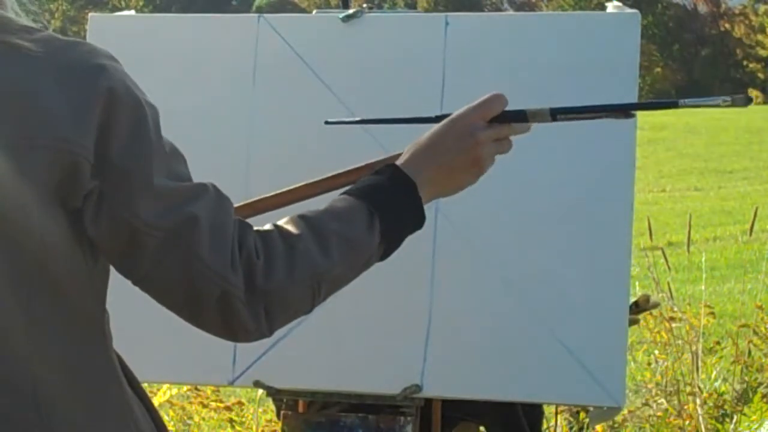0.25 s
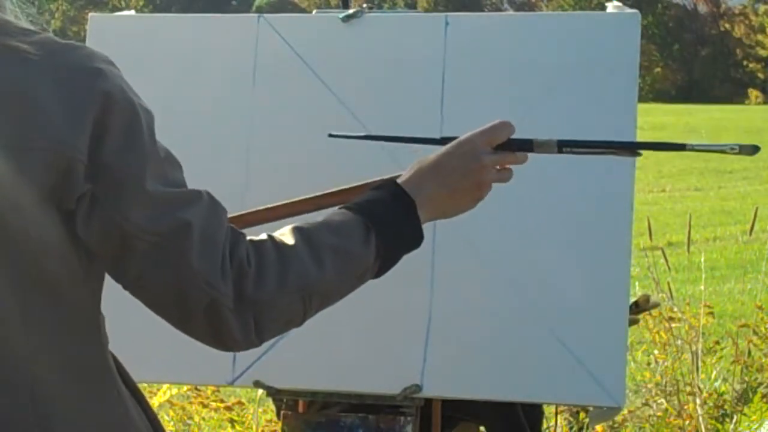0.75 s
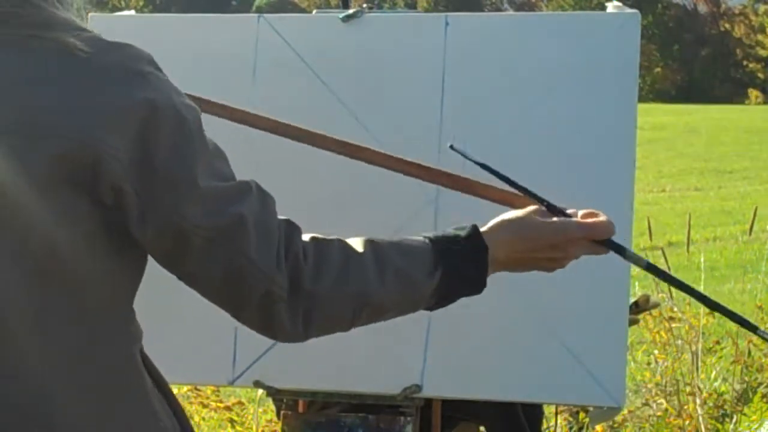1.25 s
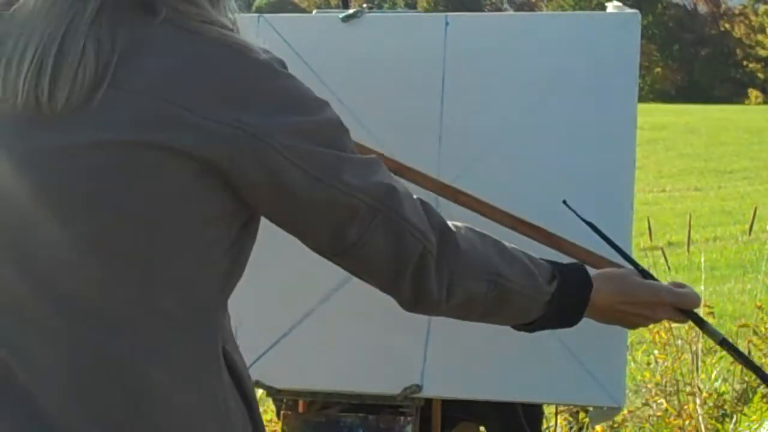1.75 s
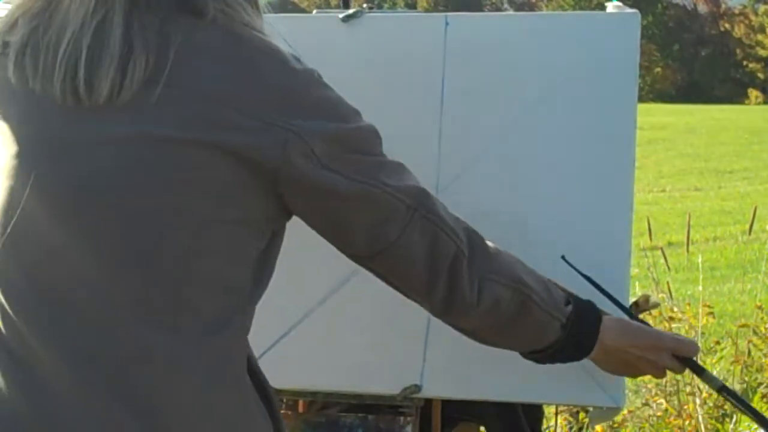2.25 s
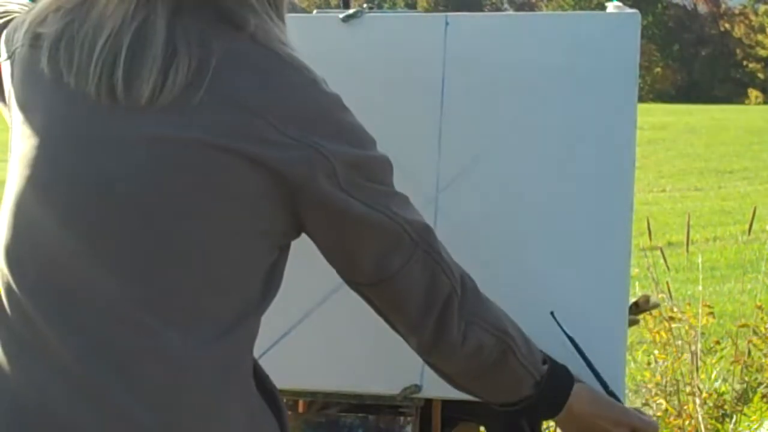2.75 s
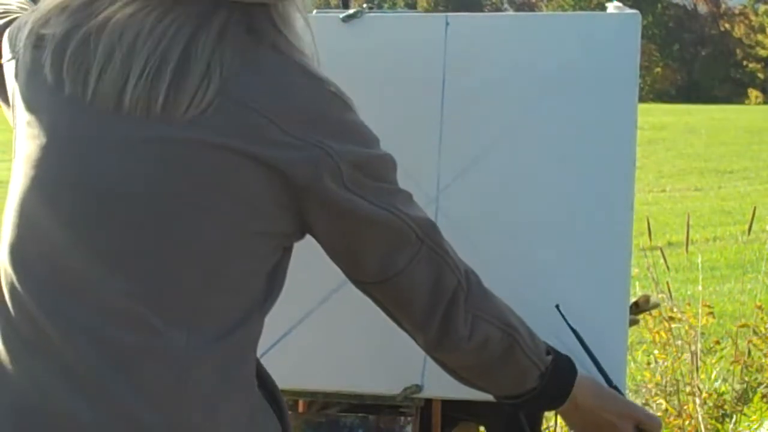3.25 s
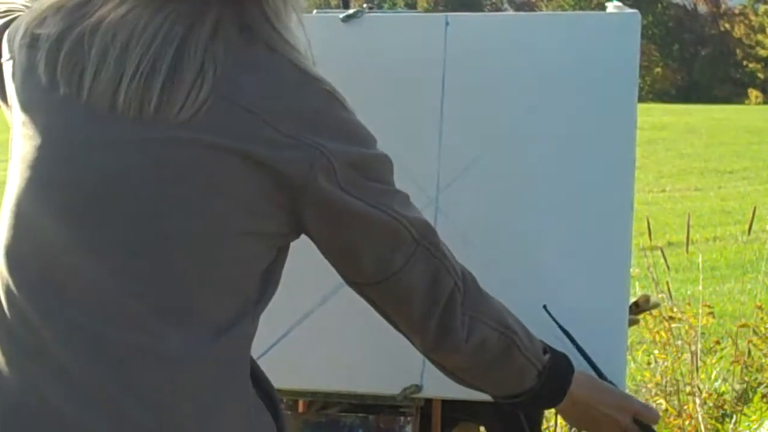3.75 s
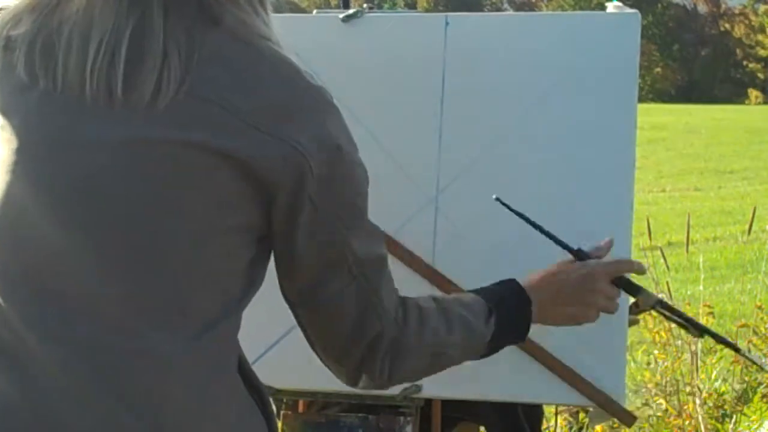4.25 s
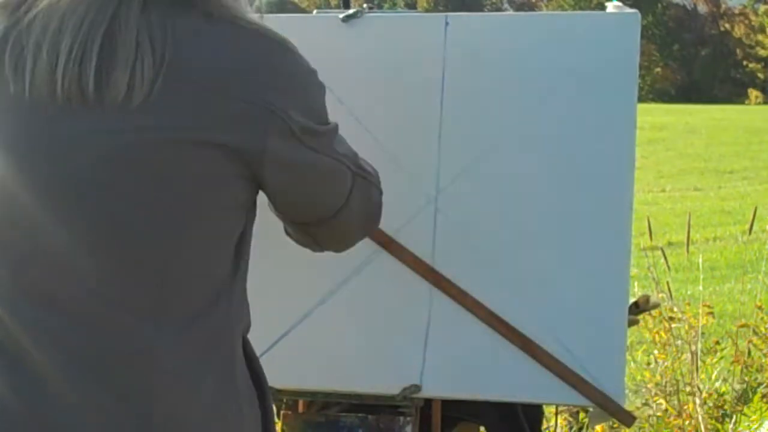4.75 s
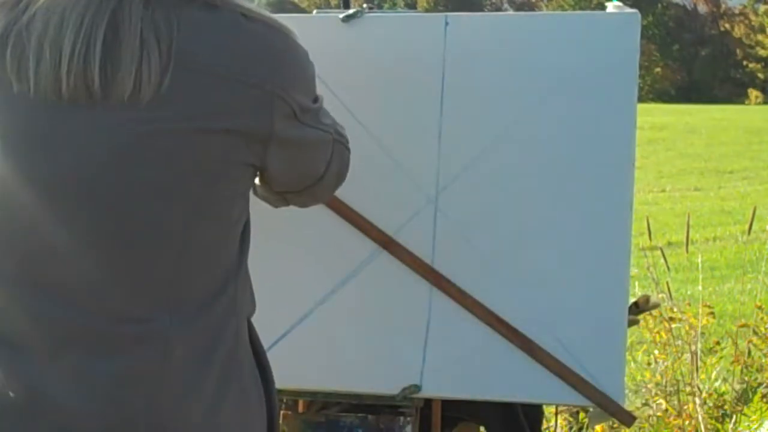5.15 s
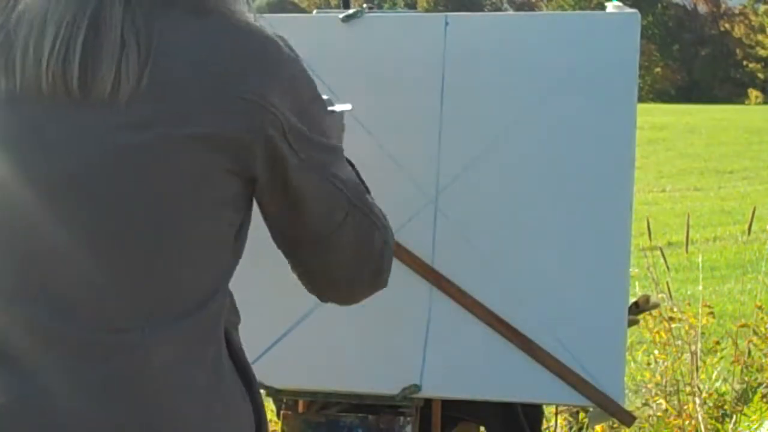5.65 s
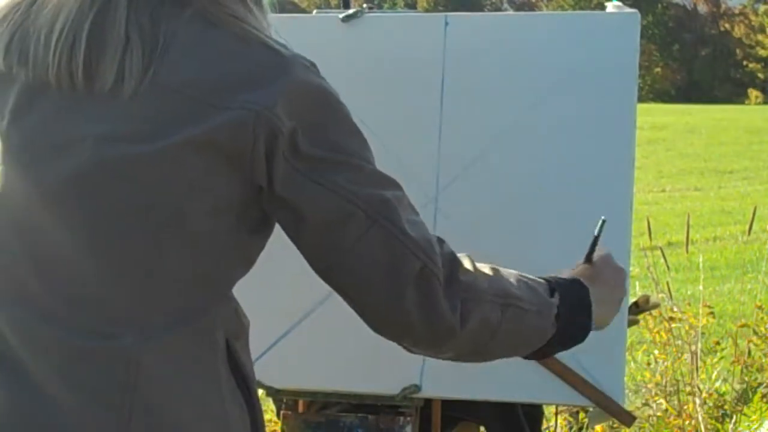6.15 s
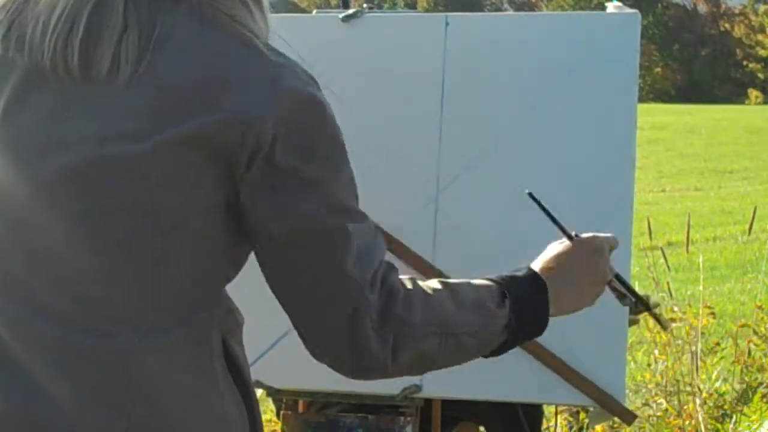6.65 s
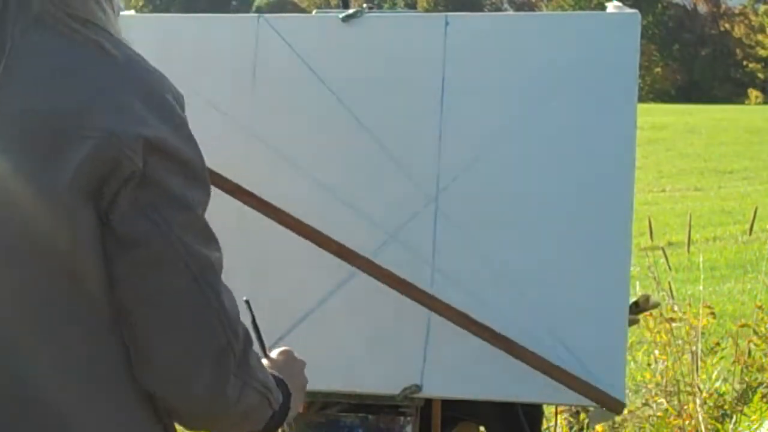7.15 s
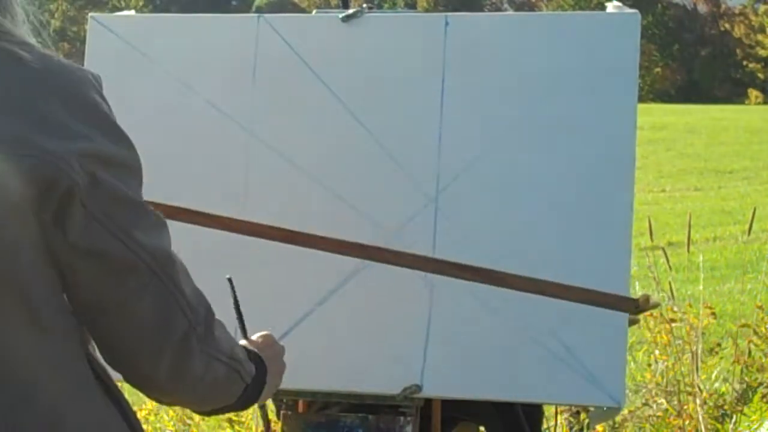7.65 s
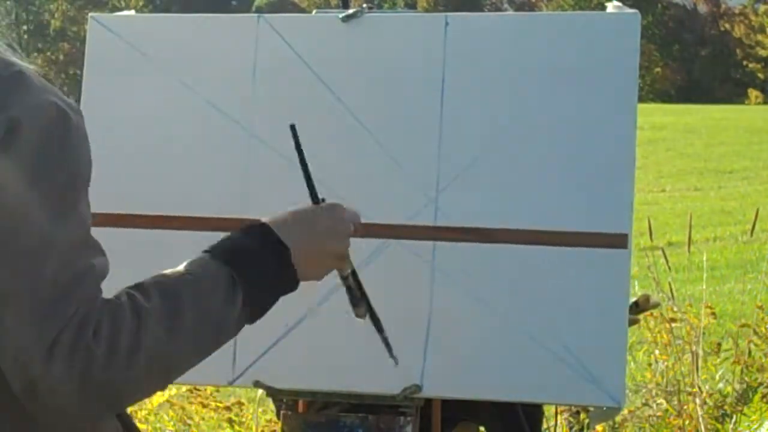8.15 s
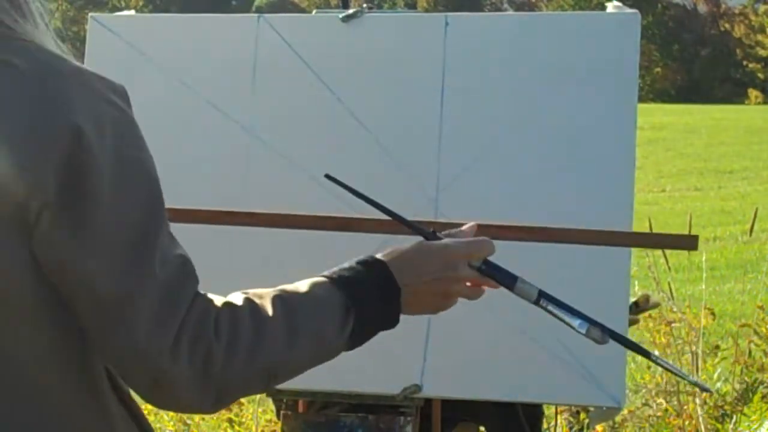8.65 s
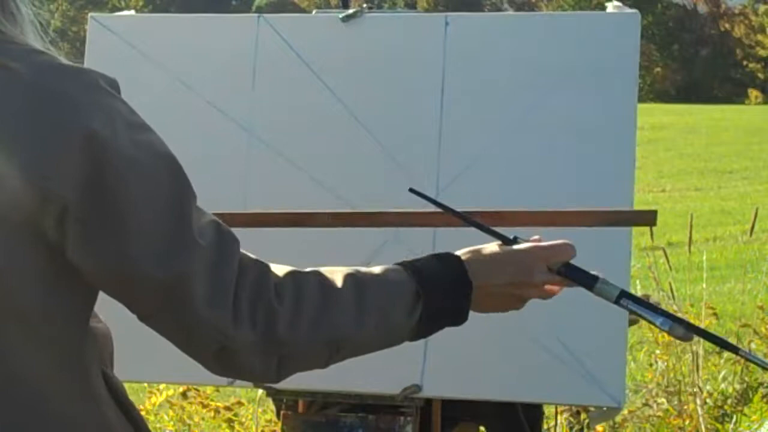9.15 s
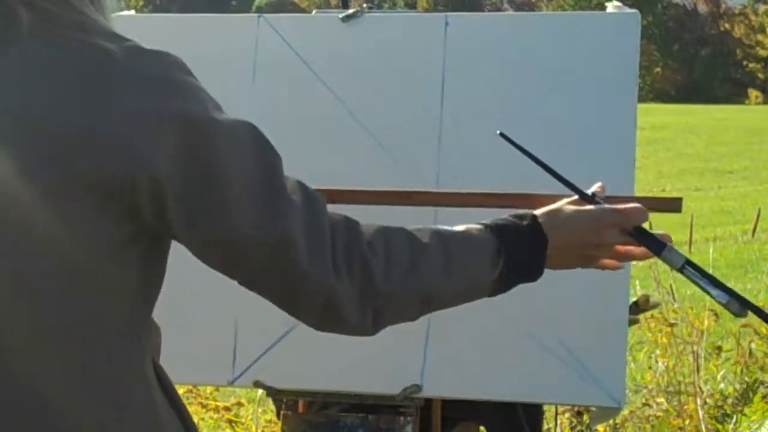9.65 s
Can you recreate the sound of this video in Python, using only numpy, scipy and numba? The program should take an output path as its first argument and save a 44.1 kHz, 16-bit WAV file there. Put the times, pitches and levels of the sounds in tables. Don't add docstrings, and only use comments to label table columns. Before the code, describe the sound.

Ground and tree crickets tinkle and trill continuously in an open meadow while a brush and wooden stick softly scrape and tap a canvas.

```python
import sys
import numpy as np
from scipy import signal
from scipy.fft import rfft, irfft
from scipy.io import wavfile
from scipy.ndimage import uniform_filter1d
from numba import njit

SR = 44100
rng = np.random.default_rng(int(sys.argv[2]) if len(sys.argv) > 2 else 0)


def magnitude_from_level(level_db):
    exponent = np.asarray(level_db, float) / 20
    return 10 ** exponent


def to_wav(sig):
    pcm = np.clip(np.atleast_2d(sig), -1, 1) * 32767
    pcm = np.round(pcm).astype(np.int16)
    wavfile.write(sys.argv[1], SR, pcm.T)


N = 436590
TIME = np.arange(N) / SR


def curve(rows):
    s, *columns = np.transpose(rows)
    return [np.interp(TIME, s, c) for c in columns]


def level(x, db):
    return x * magnitude_from_level(db) / np.sqrt(np.mean(x ** 2))


def colour(x, points):
    hz, db = np.transpose(points)
    at = np.log(np.arange(N // 2 + 1) * SR / N + 1)
    return irfft(rfft(x) * magnitude_from_level(np.interp(at, np.log(hz), db)), N)


def band(x, lo_hz, hi_hz):
    return signal.sosfilt(signal.butter(2, [lo_hz, hi_hz], "band", fs=SR, output="sos"), x)


def walk(rate):
    k = int(SR / rate)
    held = np.repeat(rng.standard_normal(N // k + 1), k)
    return 1.3 * uniform_filter1d(uniform_filter1d(held, k), k)[:N]


def sides(db):
    return magnitude_from_level(np.array([[.5], [-.5]]) * db)


def swells(rows, rest_db=-120):
    drop_db, roundness = 14.5, 1.66
    power = 0
    for s, swell, fade, *db in rows:
        away = np.where(TIME < s, (s - TIME) / swell, (TIME - s) / fade)
        power = power + magnitude_from_level(np.array(db)[:, None] - drop_db * away ** roundness) ** 2
    return np.sqrt(power + magnitude_from_level(rest_db) ** 2)


def grass(x, t60, wet_db):
    t = np.arange(SR // 5) / SR
    tail = rng.standard_normal((2, len(t))) * 1000 ** (-t / t60)
    tail *= magnitude_from_level(wet_db) / np.sqrt(np.sum(tail ** 2, axis=1, keepdims=True))
    return x + signal.fftconvolve(x, tail, axes=1)[:, :N]


@njit
def stroke(since, top, rise, fall, start, end, lead, bend):
    out, turn = np.zeros((2, len(since))), 0.
    for i in range(len(since)):
        u = since[i] / (fall if since[i] > 0 else rise)
        if abs(u) < 1:
            hz = top[i] - (end if u > 0 else start) * abs(u) ** bend
            turn += 2 * np.pi * hz / SR
            swell = (1 - u * u) ** 1.4
            out[0, i] = swell * np.sin(turn + lead)
            out[1, i] = swell * np.sin(turn)
    return out


def singer(ahead, rate, top_hz, rise, fall, start_hz, end_hz, lead):
    beat = rate * TIME + ahead + .5
    draws = rng.standard_normal((int(rate * N / SR) + 9, 3))
    late, sharp, strong = draws[np.clip(beat.astype(int) + 4, 0, None)].T
    since = (beat % 1 - .5) / rate + .0008 * late
    hz = top_hz * (1 + .004 * sharp + .0015 * walk(250))
    bend = 1.7 if rate < 30 else 1.15
    tone = stroke(since, hz, 1. * rise, 1. * fall, 1. * start_hz, 1. * end_hz, 1. * lead, bend)
    return tone * magnitude_from_level(1.4 * strong + 1.6 * walk(300))


# (time [s], lead over a steady beat [strokes], level [dB])
GROUND_1 = [(0, -.47, 0), (1.8, -.45, .5), (4.5, -.55, .5), (5.9, -.52, 1.8), (7.2, -.5, -.8),
            (8.1, -.42, -2), (9.9, -.25, 0)]
GROUND_2 = [(0, -.21, .7), (1.8, -.2, .7), (3.6, -.32, -.7), (6.3, -.24, -.6), (9.9, -.21, .8)]
GROUND_3 = [(0, -.34, -4), (.9, -.72, -4), (1.5, -.34, -2), (4.5, .09, 1.6), (5, -.2, 1), (7.3, -.4, 1),
            (8.1, -.26, -2), (8.55, .18, -1), (9.9, -.02, .8)]
GROUND_4 = [(0, .18, .8), (3.6, .14, -2.5), (6.3, .39, -1), (7.2, .6, 0), (9.9, .45, 0)]
GROUND_5 = [(0, .17, .8), (3.3, .26, -1), (4.4, 0, -5), (4.95, -.18, -.8), (6.6, -.48, 0), (7.2, -.38, 0),
            (8.5, -.38, .3), (9.9, -.12, 0)]
GROUND_6 = [(0, .3, 0), (1.8, -.1, .5), (4.5, -.33, 3.3), (6.3, -.09, -6), (7.2, -.04, -11),
            (9.9, -.33, -9)]
TREE_1 = [(0, .22, 0), (1.1, .33, 0), (2.9, 0, 0), (5.7, .15, 0), (8.4, .02, 0), (9.9, -.24, 0)]
TREE_2 = [(0, -.9, -9), (1.3, -.36, -6), (2.6, .36, 0), (5.4, .56, 0), (8.5, -.45, 0), (9.9, -1.27, 0)]
TREE_3 = [(0, -.27, 1), (4.3, -.35, 0), (5.5, .6, -1), (7.5, .8, -2), (9.9, .55, -1)]
PACES = [13.47, 14.1, 14.7, 14.95, 17.15, 18.65, 39.85, 49.1, 47.2]
# (top [Hz], rise [s], fall [s], start below top [Hz], end below top [Hz])
WINGS = [(7760, .012, .014, 550, 1150), (7090, .015, .018, 500, 900), (6860, .014, .017, 350, 700),
         (6450, .012, .017, 300, 800), (7900, .014, .011, 750, 600), (8250, .011, .011, 500, 500),
         (3750, .007, .008, -450, 400), (4230, .006, .006, -400, 350), (3750, .008, .008, -450, 400)]
# (peak level [dB], left minus right [dB], left leads by [rad])
PLACES = [(-29.5, 16, 1.3), (-31.5, 7, -1.0), (-33.5, 6, -2.7), (-38.5, 1, -2.3), (-33, 16, -2.2),
          (-45, 15, -2.1), (-54.5, 2, -1.4), (-53, 0, 0.5), (-58, -1, 1.)]


def near_crickets():
    out = 0
    drifts = [GROUND_1, GROUND_2, GROUND_3, GROUND_4, GROUND_5, GROUND_6, TREE_1, TREE_2, TREE_3]
    for drift, rate, wing, (db, pan_db, lead) in zip(drifts, PACES, WINGS, PLACES):
        ahead, swell_db = curve(drift)
        out = out + singer(ahead, rate, *wing, lead) * magnitude_from_level(db + swell_db) * sides(pan_db)
    return out * magnitude_from_level(-8.5)


# (lowest pitch [Hz], highest pitch [Hz], slowest [strokes/s], fastest [strokes/s],
# level [dB], left minus right [dB])
CHORUS = [
    (7095, 7950, 12, 19, -50, 13),
    (6490, 7200, 13, 15, -48, 1.5),
    (4095, 5100, 35, 55, -64.5, -3),
    (5970, 6450, 14, 17, -61, -5),
]


def far_crickets(count=7):
    out = 0
    for lo, hi, slow, fast, db, pan_db in CHORUS:
        for k, (pace, ahead, lead) in enumerate(rng.random((count, 3))):
            rate = slow + (fast - slow) * pace
            top_hz = (lo + (hi - lo) * k / (count - 1)) * (1 + .008 * walk(.4))
            shape = (.012, .018, 350, 800) if rate < 30 else (.003, .011, 30, 700)
            song = singer(ahead + .3 * walk(.5), rate, top_hz, *shape, 2 * np.pi * lead)
            out = out + song * magnitude_from_level(db + 1.5 * walk(.7)) * sides(pan_db)
    return out


# (frequency [Hz], level [dB per Hz])
AIR_COLOUR = [(20, -1.5), (60, -2), (130, 0.5), (300, -0.5), (800, 0), (1800, -3), (3200, -5),
              (5500, -15.5), (8000, -2.5), (9200, -8), (11000, -12.5), (14000, -7.5)]
# (frequency [Hz], left minus right [dB])
AIR_LEAN = [(60, 0), (110, 3.5), (200, 6.5), (370, 8), (690, 5.5), (1270, 5.5), (2340, 3.5), (4320, 4.5),
            (7950, -11), (14600, 6.5)]


def countryside():
    shared, own = rng.standard_normal(N), rng.standard_normal((2, N))
    hz, db = np.transpose(AIR_LEAN)
    hum = []
    for k, side in enumerate([1, -1]):
        noise = colour(.5 * shared + own[k], AIR_COLOUR)
        hum.append(colour(noise, np.transpose([hz, side * db / 2])))
    return level(np.array(hum), -58)


def motor():
    turn = 2 * np.pi * np.cumsum(136 + 2.98 * walk(3)) / SR
    return magnitude_from_level(-79.5) * np.sin(turn) * magnitude_from_level(2.6 * walk(6.1)) * sides(5.2)


# (time [s], peak level [dB], pitch [Hz], left minus right [dB])
PUFFS = [(0.434, -64, 29.6, 5.5), (0.599, -59, 29.6, -11), (0.651, -55, 56.5, -21), (0.779, -59, 29.6, -18),
         (0.834, -54, 67.3, -18), (0.899, -51.5, 29, -15), (1.709, -54, 64.6, -12), (3.124, -54, 29.6, -15),
         (3.578, -55.5, 32.3, -13), (4.125, -54.5, 40.4, -20), (4.744, -59, 32.3, -18),
         (8.006, -59, 29.6, -1), (8.134, -63, 29.6, -1), (8.29, -65, 29.6, -23), (8.418, -55.5, 53.8, 1)]


def wind():
    breeze_db, wake_db, wake_s = -76.5, -17, .34
    gusts = [level(band(rng.standard_normal(N), 20, 85) * magnitude_from_level(2.8 * walk(17)), 0) for _ in range(2)]
    wakes = [(s, wake_s, wake_s, db + wake_db) for s, db, *_ in PUFFS]
    rumble = np.array(gusts) * swells(wakes, breeze_db) * sides(-3.5)
    thumps = np.zeros((2, N + SR))
    t = np.arange(SR // 8) / SR
    for s, db, hz, pan_db in PUFFS:
        i = int(s * SR)
        puff = np.sin(2 * np.pi * hz * t) * np.exp(-((t - .025) / .016) ** 2)
        thumps[:, i:i + len(t)] += magnitude_from_level(db + 6.5) * puff * sides(pan_db) * [[1], [-.4]]
    return rumble + thumps[:, :N]


# (time [s], peak level [dB], level of the stroke before [dB])
CHIRPS = [(0.1351, -47, -2), (0.4155, -48, -2), (0.6898, -49, -1), (1.0575, -48, -2), (1.3394, -50, 0),
          (1.6107, -51, -4), (1.9515, -49, -2), (2.355, -47, -1), (2.7766, -48, -4), (3.222, -47.5, 0),
          (3.6556, -45.5, 0), (3.9255, -45.5, -1), (4.321, -47.5, -1), (4.6164, -48, -2), (4.9581, -49, -3),
          (5.3328, -48.5, -1), (5.5872, -48, -5), (5.915, -49, -3), (6.2901, -51, 0), (6.6243, -54, 2),
          (7.0579, -50, -2), (7.7363, -55, -2), (8.6512, -49.5, 1), (9.0174, -46, -4), (9.3651, -47.5, -1),
          (9.7403, -46.5, -4)]


def field_cricket(gap=.039, crest=.004):
    out = np.zeros((2, N))
    since = np.arange(-SR // 50, SR // 50) / SR
    for s, db, second_db in CHIRPS:
        for k, (hz, rel_db) in enumerate([(4983, 0), (4940, second_db), (4680, -12)]):
            i = int((s + crest - k * gap) * SR) - SR // 50
            tone = stroke(since, hz + 0 * since, .008, .012, 150., 600., .8, 2.1)
            out[:, i:i + len(since)] += magnitude_from_level(db + rel_db) * tone
    return out * sides(-7.5)


# (frequency [Hz], level [dB per Hz])
BRISTLES = [(300, -19), (700, -14), (1400, -8), (2500, -4), (4000, -3.5), (5500, 4), (7500, 4.5),
            (10000, -7.5), (14200, -18)]
# (frequency [Hz], width [Hz], level [dB])
STICK = [(509, 160, 0.5), (809, 178, 1), (1072, 226, -4.5)]
# (crest time [s], swell [s], fade [s], bristle level [dB], brightness level [dB])
BRUSH = [(1.15, .2, 0.31, -66.5, -70), (1.4, 0.19, 0.095, -72, -57.5), (1.6, 0.37, 0.35, -63.5, -68),
         (2.7, 0.071, 0.073, -70, -76), (4.71, 0.43, 0.48, -64, -71), (5.68, 0.23, 0.58, -63, -71.5),
         (6.33, 0.51, 0.3, -65.5, -72.5), (6.91, .15, 0.19, -53.5, -58), (7.18, 0.11, 0.27, -51.5, -55.5),
         (7.39, 0.086, 0.26, -56.5, -60), (8.09, 0.12, 0.1, -47.5, -49.5), (8.4, 0.75, 0.65, -66, -71),
         (9.65, 1, 0.32, -72.5, -76.5), (7.75, .25, .25, -75, -72.5)]
# (crest time [s], swell [s], fade [s], level [dB])
DRAGS = [(1.15, .2, .4, -67), (1.64, 0.14, 0.037, -61.5), (1.88, 0.13, .7, -63.5),
         (2.73, 0.033, 0.097, -64), (4.6, .4, .4, -70), (5.7, 0.19, 0.4, -59), (6.2, .3, 0.4, -65),
         (6.48, 0.14, .05, -60), (6.96, 0.22, 0.066, -59), (7.11, 0.097, 0.087, -60),
         (7.39, 0.14, .1, -59.5), (8.02, 0.054, .04, -56), (8.11, 0.052, 0.22, -59)]


def rubbing():
    rest_db, rest_bright_db, rest_wood_db = -75.5, -91, -76
    body, shine = swells(BRUSH)
    wood = swells(DRAGS, rest_wood_db)
    spikes_db = 2.0 * rng.exponential(size=N).clip(0, 4)
    slips = rng.standard_normal(N) * magnitude_from_level(spikes_db + walk(40))
    hiss = colour(slips, BRISTLES)
    hiss /= np.std(band(hiss, 1500, 3300))
    dull = colour(hiss, [(5000, 0), (10000, -30)])
    bright = hiss - dull
    bright = bright / np.std(band(hiss, 9300, 13500))
    ring = sum(magnitude_from_level(db) * band(slips, hz - w / 2, hz + w / 2) for hz, w, db in STICK)
    shine = shine * sides(13) + magnitude_from_level(rest_bright_db) * sides(8)
    scrape = dull * np.hypot(body, magnitude_from_level(rest_db)) + level(ring, -5.5) * wood
    return grass(scrape * sides(.2) + bright * shine, t60=.03, wet_db=-11)


# (time [s], peak level [dB])
SNAPS = [
    (1.6382, -36),
]


def snap():
    out = np.zeros((2, N))
    t = np.arange(SR // 10) / SR
    for s, db in SNAPS:
        i = int(s * SR)
        click = band(rng.standard_normal(len(t)) + 4.4 * (t == 0), 1700, 11000)
        out[:, i:i + len(t)] += magnitude_from_level(db + 6) * click * 1000 ** (-t / .0047)
    return out


# (time [s], peak level [dB], pitch [Hz], left minus right [dB])
TAPS = [
    (1.799, -51, 590, 6),
    (2.679, -46.5, 784, 2.0),
    (2.728, -38.5, 820, 0),
    (4.262, -49.5, 573, 3.5),
    (4.336, -47.5, 509, 1.5),
    (4.599, -55, 490, 4.5),
    (6.479, -44.5, 814, 0.5),
    (6.765, -49.5, 519, 0),
]


def taps():
    out = np.zeros((2, N))
    t = np.arange(SR // 10) / SR
    for s, db, hz, pan_db in TAPS:
        i = int(s * SR)
        ring = np.sin(2 * np.pi * hz * t)
        for ratio in (1.23, .514):
            ring += .31 * np.sin(2 * np.pi * ratio * hz * t)
        thud = band(band(rng.standard_normal(len(t)), 300, 1340), 300, 1340)
        knock = .64 * ring * 1000 ** (-t / .041) + 1.15 * thud * 1000 ** (-t / .099)
        out[:, i:i + len(t)] += magnitude_from_level(db) * knock * sides(pan_db)
    return out


def scene():
    near = grass(near_crickets() + field_cricket(), t60=.05, wet_db=-11)
    far = grass(far_crickets(), t60=.12, wet_db=-4)
    return near + far + countryside() + motor() + wind() + rubbing() + snap() + taps()


def band_limit(x):
    return signal.sosfilt(signal.butter(12, 14300, fs=SR, output="sos"), x)


def record(dry):
    mix = signal.sosfilt(signal.ellip(10, .2, 90, 14150, fs=SR, output="sos"), dry)
    return band_limit(mix)


dry = scene()
out = record(dry)
to_wav(out)
```